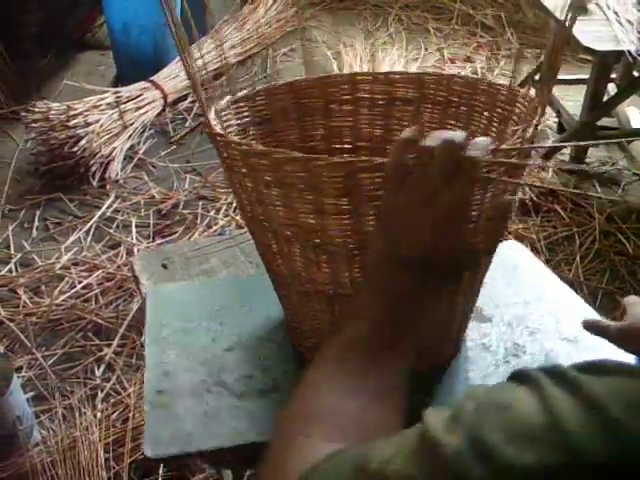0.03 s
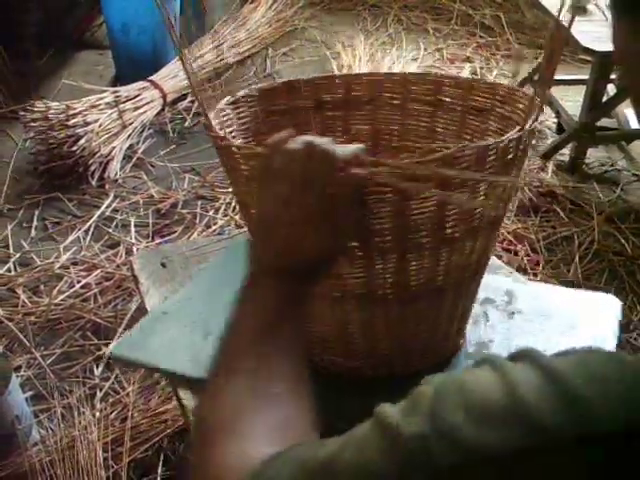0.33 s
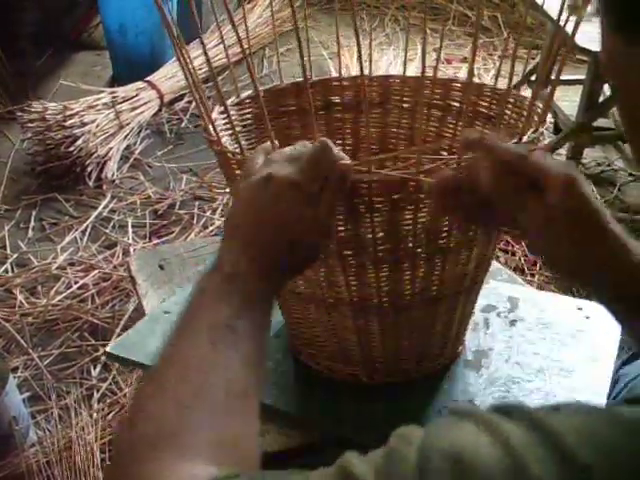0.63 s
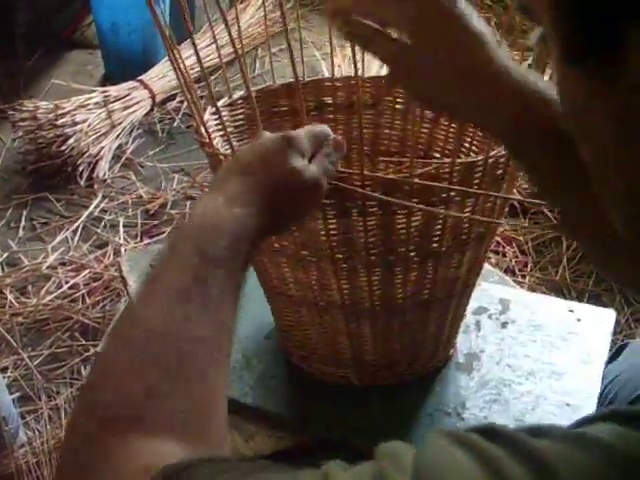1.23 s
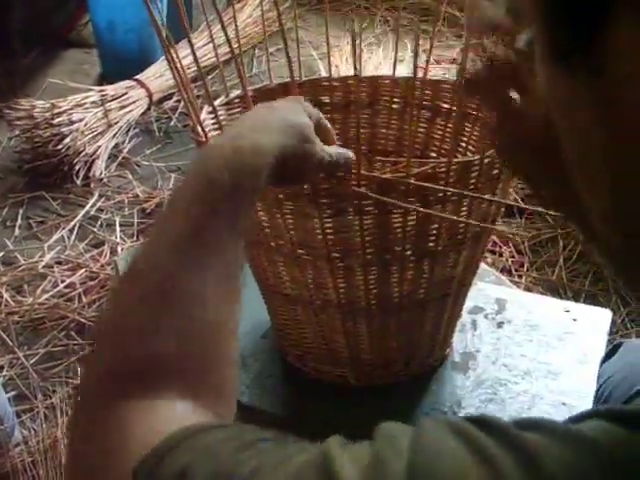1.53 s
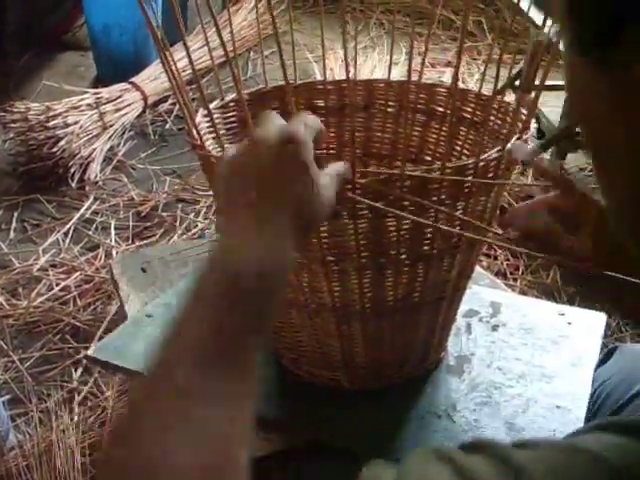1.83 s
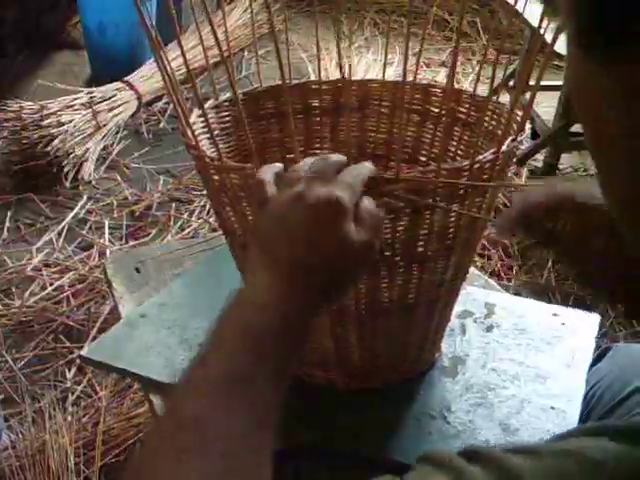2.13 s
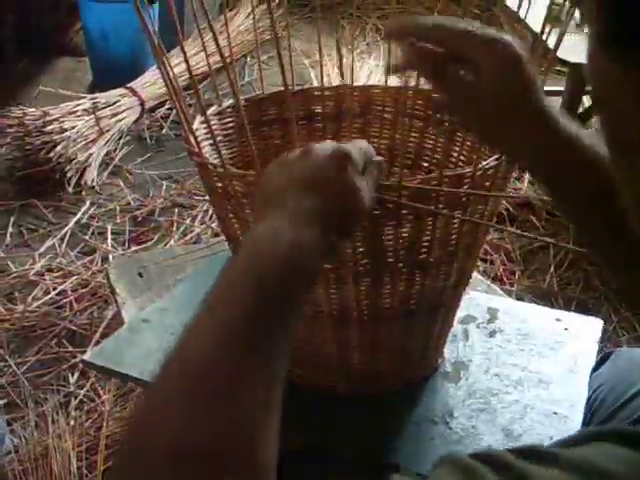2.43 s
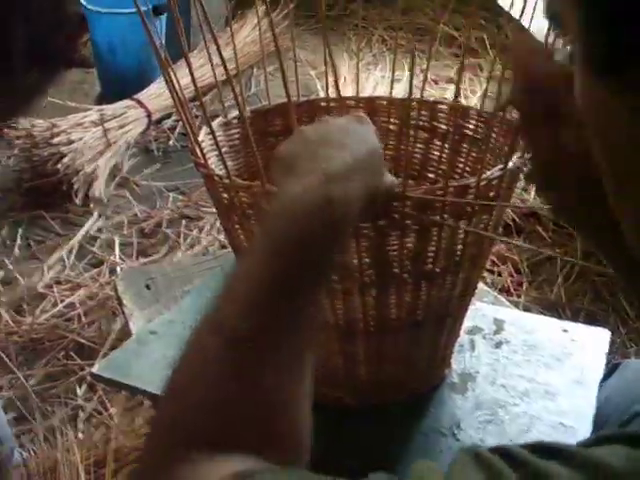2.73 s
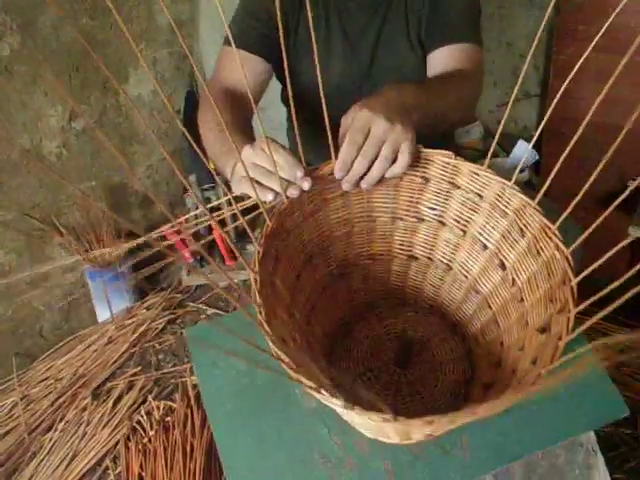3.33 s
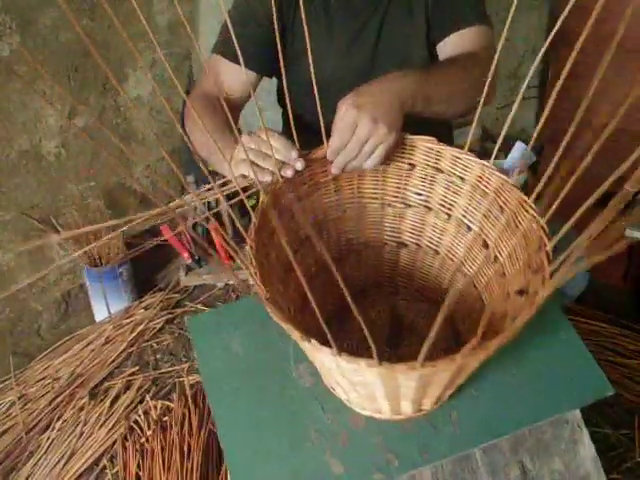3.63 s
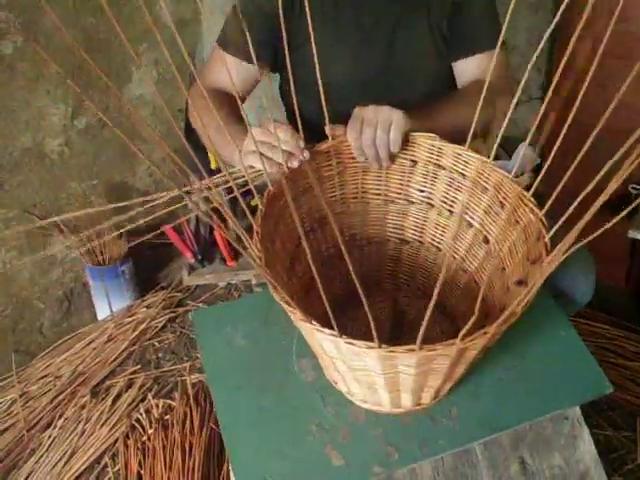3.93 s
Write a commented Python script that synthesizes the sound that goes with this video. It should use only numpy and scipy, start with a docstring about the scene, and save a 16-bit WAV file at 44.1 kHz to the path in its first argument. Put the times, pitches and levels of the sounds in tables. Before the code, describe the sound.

Willow rods rustle and scrape as a basket is woven by hand in a quiet workshop. A soft, slightly squeaky pull fills the first half second, followed by short, faint tucks and small clicks. Around 2.7 seconds a tight rod gives a close run of dry knocks. A loud snap comes at 3.1 seconds, then a smaller one, and a scraping pull with faint creaks lasts until about 4 seconds.

```python
"""In a workshop, willow rods are woven by hand into a basket that stands on a board.
Friction is the driving force: rods scrape past the upright stakes in short tucks and two long pulls,
and the resonances of the woven wall and the base rustle and rumble in answer. Now and then a rod sings
as it slides or flicks against a stake, and once the basket bumps on the board. Close by, a tight rod
sticks and slips in a run of dry knocks, and bent rods snap, one of them loudly."""
import sys
import numpy as np
from scipy import signal
from scipy.fft import rfft, irfft
from scipy.io import wavfile

SR = 44100
rng = np.random.default_rng(int(sys.argv[2]) if len(sys.argv) > 2 else 0)


def transcribe(signal):
    """Save signal, clipped to [-1, 1], as a 16-bit WAV file at the path in sys.argv[1]."""
    frames = np.atleast_2d(signal).T
    limited = np.clip(frames, -1, 1)
    pcm = np.round(limited * 32767).astype(np.int16)
    wavfile.write(sys.argv[1], SR, pcm)


N = 176400
TIME = np.arange(N) / SR

# spectrum of a scraping or splintering rod: frequency_hz, density_db
ROD_SPECTRUM = [(250, -22), (600, -13), (1550, -2.5), (2350, -3), (2850, 0), (3450, -4), (4200, -2),
                (4900, -6), (5600, -18.5), (6500, -14)]


def from_db(db):
    """Decibels are logarithmic: 20 dB is a factor of ten in amplitude."""
    return 10 ** (np.asarray(db) / 20)


def rms_one(x):
    """Normalisation: scale a signal to unit rms."""
    return x / np.sqrt(np.mean(x ** 2) + 1e-20)


def coloured(x, points):
    """Spectral shaping: filter by a curve through (frequency_hz, level_db) points; unit rms."""
    hz, db = np.transpose(points)
    bins_hz = np.maximum(np.arange(N // 2 + 1) * SR / N, 1)
    gain = from_db(np.interp(np.log(bins_hz), np.log(hz), db))
    return rms_one(irfft(rfft(x) * gain, N))


def drift(rate_hz):
    """Low-passed noise wanders at random, mostly slower than rate_hz; unit rms."""
    bins_hz = np.arange(N // 2 + 1) * SR / N
    return rms_one(irfft(rfft(rng.standard_normal(N)) / (1 + (bins_hz / rate_hz) ** 2), N))


def fade(t, t60):
    """Damping: free vibration decays exponentially, by 60 dB in t60 seconds."""
    return np.exp(-np.log(1000) * np.maximum(t, 0) / t60)


def struck(modes, t):
    """Modal response to a blow: a sum of damped sines, each (pitch_hz, level_db, t60_s)."""
    return sum(from_db(db) * np.sin(2 * np.pi * hz * t) * fade(t, t60) for hz, db, t60 in modes)


def add(out, start_s, sound):
    """Superposition: a sound adds to the mix from its start time."""
    i = int(start_s * SR)
    out[i:i + len(sound)] += sound[:N - i]


def friction(grains_per_s=6500, spread_db=2, judder_db=1, judder_hz=73):
    """Friction as shot noise: bark catches on bark in dense, uneven impulses."""
    size_db = spread_db * np.minimum(rng.exponential(1, N), 5) + judder_db * drift(judder_hz)
    signs = rng.choice([-1, 1], N)
    catches = rng.random(N) < grains_per_s / SR
    return from_db(size_db) * signs * catches


def resonate(force, resonances):
    """Forced vibration: friction drives parallel resonances of alternating sign, which ring on."""
    t = TIME[:SR // 4]
    ring = sum((-1) ** k * from_db(db) * width * np.exp(-np.pi * width * t) * np.cos(2 * np.pi * hz * t)
               for k, (hz, width, db) in enumerate(resonances))
    drive = rms_one(friction()) * force
    return signal.fftconvolve(drive, ring / np.sqrt(np.sum(ring ** 2)))[:N]


def room_air(level_db=-57.5):
    """Ambient noise: a faint, steady hush, strongest in the bass."""
    # spectrum of the quiet workshop: frequency_hz, density_db
    spectrum = [(25, 6.5), (60, -1), (400, -4), (950, -4), (4200, -10), (5200, -13.5), (6500, -40)]
    return from_db(level_db) * coloured(rng.standard_normal(N), spectrum)


def basket_bumps(rise_s=0.012):
    """A soft impact on the board excites low modes of the basket."""
    # impacts on the board: start_s, level_db
    impacts = [(2.008, -45.5)]
    # low modes of the basket: pitch_hz, level_db, t60_s
    modes = [(145.6, -1, 0.32), (204, 7.5, 0.098), (238, -2.5, 0.17)]
    out, t = np.zeros(N), TIME[:SR // 2]
    for start_s, db in impacts:
        add(out, start_s, from_db(db) * np.minimum(t / rise_s, 1) * struck(modes, t))
    return out


def stake_flicks():
    """A rod lands on a stake, and its dying rattle drives resonances at that stake's own pitch."""
    # flicks against a stake: start_s, level_db, rattle_t60_s, pitch_ratio
    flicks = [(0.623, -49, 0.31, 0.89), (1.254, -50.5, 0.7, 1.16), (1.456, -45.5, 0.35, 1.065),
              (3.476, -36, 0.15, 0.927)]
    # resonances of a stake: pitch_hz, width_hz, level_db
    stake_modes = [(1030, 90, 2), (1650, 160, -4), (2265, 360, -7.5)]
    out = np.zeros(N)
    for start_s, db, t60, ratio in flicks:
        rattle = from_db(db) * (TIME >= start_s) * fade(TIME - start_s, t60)
        out += resonate(rattle, [(hz * ratio, width, level) for hz, width, level in stake_modes])
    return out


def rod_groans(min_width_hz=15, width_share=0.058):
    """Friction excites a narrow resonance, which glides as the free length of the rod changes."""
    # a sliding rod sings: start_s, length_s, first_hz, last_hz, level_db
    groans = [(0.043, 0.16, 4490, 3893, -42), (0.047, 0.1, 3200, 2710, -43.5),
              (0.158, 0.086, 2870, 2905, -42.5), (0.618, 0.06, 996, 970, -50.5),
              (0.851, 0.025, 4330, 4310, -48), (2.062, 0.11, 989, 1003, -54),
              (3.192, 0.03, 5070, 3880, -31), (3.22, 0.08, 2020, 1990, -38.5),
              (3.572, .15, 430, 259, -39.5), (3.69, 0.094, 951, 918, -38), (3.683, 0.13, 412, 451, -44.5)]
    out = np.zeros(N)
    for start_s, length_s, first_hz, last_hz, db in groans:
        progress = np.clip((TIME - start_s) / length_s, 0, 1)
        phase = 2 * np.pi * np.cumsum(first_hz + (last_hz - first_hz) * progress) / SR
        width_hz = min_width_hz + width_share * first_hz
        # a weak tone inside a band of noise
        rough_tone = (1 + drift(width_hz)) * np.sin(phase) + drift(width_hz) * np.cos(phase)
        out += from_db(db) * np.sin(np.pi * progress) * rough_tone / np.sqrt(2)
    return out


def weaving(rod_gain_db=0.55, wall_gain_db=-2.2, base_gain_db=-4.5):
    """Sliding friction drives rod, woven wall and base; incoherent strokes add in power."""
    # short tucks of a rod: start_s, rise_s, t60_s, rod_db, wall_db
    tucks = [(0.619, 0.004, 0.59, -61.5, -54), (0.8, 0.077, 0.25, -51, -56),
             (.895, 0.0084, 0.35, -49.5, -52.5), (1.2005, 0.0011, 0.23, -51.5, -55),
             (1.246, 0.013, 0.41, -41.5, -51.5), (1.308, 0.002, 0.33, -46, -47.5),
             (1.453, 0.0012, 0.39, -46.5, -44.5), (1.642, 0.0098, 0.6, -52, -51),
             (2.076, 0.016, 1, -50, -55), (2.158, 0.00071, 0.026, -44.5, -49),
             (2.175, 0.0012, 0.25, -48, -52), (2.236, 0.019, 0.52, -42, -41), (2.263, 0.012, 0.1, -38, -43),
             (2.378, 0.0014, 0.97, -43, -46), (2.474, 0.0017, 0.43, -42, -48),
             (2.484, 0.036, 0.65, -40, -43), (2.657, .004, 0.25, -40, -34.5),
             (2.701, 0.076, 0.34, -38.5, -35), (2.835, 0.025, 0.55, -47.5, -46.5),
             (2.97, .03, 1, -53.5, -46.5), (3.046, 0.015, 0.3, -44.5, -45)]
    # envelopes of the two long pulls: time_s, rod_db, wall_db, base_db
    first_pull = [(0, -43.5, -51, -40.5), (.045, -44.5, -44, -59), (.11, -41, -41, -50.5),
                  (.2, -39.5, -37, -38.5), (.275, -44, -35.5, -39.5), (.33, -49, -44.5, -42),
                  (.41, -62.5, -51.5, -54), (.52, -89, -65.5, -89)]
    second_pull = [(3.175, -32.5, -28.5, -30), (3.217, -32.5, -54, -33), (3.222, -33, -26.5, -32),
                   (3.285, -40.5, -39, -38.5), (3.31, -42, -40, -37.5), (3.38, -55.5, -49, -43),
                   (3.44, -51.5, -43.5, -47), (3.48, -44, -43, -42.5), (3.53, -50.5, -44, -44),
                   (3.665, -53.5, -43, -52.5), (3.685, -42, -45.5, -47), (3.729, -51.5, -44, -39.5),
                   (3.781, -48, -42.5, -39.5), (3.88, -57, -52, -44.5), (4, -51, -44, -49)]
    # the base drags on the board as the basket is turned: time_s, base_db
    drag = [(1.2, -64), (1.36, -54.5), (1.66, -52), (1.82, -77)]
    # resonances of the woven wall and of the basket on its board: pitch_hz, width_hz, level_db
    wall_modes = [(551, 140, -0.5), (660, 44, 3.5), (723.5, 41, 6.5), (836, 126, 1.5), (956, 39, 3),
                  (1038, 26, 1.5), (1166, 38, -1.5), (1360, 180, -13.5)]
    base_modes = [(153.7, 42, -8), (245, 25.4, 1), (313.8, 11, -0.5), (397, 57, -3), (474, 45, -5.5)]
    base_re_wall_db, base_low_hz = -10.5, 160
    # a bright bite as each tuck takes hold
    bite_hz, bite_width_hz, bite_db, bite_t60_s = 4230, 780, 5.5, 0.056

    power, bite_force = np.zeros((3, N)), np.zeros(N)
    for start_s, rise_s, t60, rod_db, wall_db in tucks:
        grip = np.clip((TIME - start_s) / rise_s, 0, 1)
        gains = from_db([rod_db, wall_db, wall_db + base_re_wall_db])[:, None]
        power += (gains * grip * fade(TIME - start_s - rise_s, t60)) ** 2
        bite_force += from_db(rod_db + bite_db) * grip * fade(TIME - start_s, bite_t60_s)
    for pull in (first_pull, second_pull):
        times, *levels = np.transpose(pull)
        pulling = (TIME >= times[0]) * (TIME <= times[-1])
        power += np.array([from_db(np.interp(TIME, times, db)) ** 2 for db in levels]) * pulling
    drag_db = np.interp(TIME, *np.transpose(drag), left=-np.inf, right=-np.inf)
    power[2] += from_db(drag_db) ** 2
    rod_force, wall_force, base_force = np.sqrt(power)

    scrape = from_db(rod_gain_db) * rod_force * coloured(friction(), ROD_SPECTRUM)
    bite = resonate(bite_force, [(bite_hz, bite_width_hz, 0)])
    wall = from_db(wall_gain_db) * resonate(wall_force, wall_modes)
    base = from_db(base_gain_db) * resonate(base_force, base_modes)
    radiation = signal.butter(2, base_low_hz, "high", fs=SR, output="sos")  # deep bass radiates poorly
    return scrape + bite + signal.sosfilt(radiation, wall + base)


def rod_knocks(band_hz=(237, 4250), crack_spread=0.059, squeak_s=0.0045, squeak_glide=0.69):
    """Stick-slip: each slip gives a woody ring and a crack, with a rising squeak as the bark regrips; a dull
    thud is sounded the same way."""
    # knocks close by: slips of a tight rod, and last a dull thud sounded the same way: start_s, level_db,
    # ring_hz, ring_t60_s, squeak_hz, squeak_db
    knocks = [(1.9854, -38.5, 900, 0.0085, 3300, -45), (2.6581, -7.5, 990, .011, 2750, -19),
              (2.7284, -15.5, 486, 0.0095, 2610, -40), (2.7338, -18.5, 616, 0.007, 2900, -41),
              (2.7463, -13.5, 750, 0.0053, 3510, -22.5), (2.7531, -12.5, 760, 0.013, 3410, -18),
              (2.7573, -12.5, 833, 0.015, 3730, -21.5), (2.7602, -11, 753, 0.014, 2800, -29),
              (2.7640, -14, 778, 0.032, 2720, -29), (2.7682, -11.5, 772, 0.012, 2900, -23),
              (2.7831, -6, 950, 0.0093, 3290, -29), (2.7862, -11.5, 1067, .022, 4000, -37),
              (2.8153, -12.5, 1030, 0.018, 3000, -33), (3.2222, -24, 520, 0.022, 3500, -38)]
    # modes of the crack: pitch_hz, level_db, t60_s
    crack_modes = [(1540, -6.5, 0.005), (2640, -11, 0.01), (3850, -12.5, 0.0067), (4420, -20, 0.02)]
    out, t = np.zeros(N), TIME[:SR // 10]
    softening = signal.butter(2, band_hz, "band", fs=SR, output="sos")
    progress = np.minimum(t / squeak_s, 1)
    for start_s, db, ring_hz, t60, squeak_hz, squeak_db in knocks:
        modes = [(hz * (1 + crack_spread * rng.normal()), level, decay)
                 for hz, level, decay in crack_modes]
        wood = signal.sosfilt(softening, struck([(ring_hz, 0, t60)], t) - struck(modes, t))
        rising_hz = squeak_hz * (1 + squeak_glide * (progress - .5))
        squeak = np.sin(np.pi * progress) ** 2 * np.sin(2 * np.pi * np.cumsum(rising_hz) / SR)
        add(out, start_s, from_db(db) * wood + from_db(squeak_db) * squeak)
    return out


def rod_snaps(rise_s=0.00059, chirp_s=0.0023, sweep_hz=2240, sweep_s=0.00084):
    """Dispersion: high bending waves arrive first, so a snap is a falling chirp with a splintery tail."""
    # snaps of a bent rod: start_s, level_db, final_hz
    snaps = [(1.0223, -40.5, 2810), (1.9841, -32.5, 2760), (2.4742, -28, 3510), (3.0708, -33.5, 2830),
             (3.1193, -1, 2593), (3.1798, -17, 3740), (3.477, -33.5, 3350)]
    # low ring of the rod after a snap: pitch_hz, level_db, t60_s
    body_modes = [(537, -1, 0.013), (841, 5, 0.0076), (1550, 3.5, 0.0093)]
    tail_db, tail_t60_s, body_db = -18, 0.026, -9
    out, t = np.zeros(N), TIME[:SR // 10]
    attack = np.minimum(t / rise_s, 1) ** 2
    body = from_db(body_db) * struck(body_modes, t)
    for start_s, db, final_hz in snaps:
        falling_hz = final_hz + sweep_hz * np.exp(-(t / sweep_s) ** 4)
        chirp = np.sin(2 * np.pi * np.cumsum(falling_hz) / SR) * np.exp(-(t / chirp_s) ** 4)
        splinters = coloured(rng.standard_normal(N), ROD_SPECTRUM)[:len(t)]
        tail = from_db(tail_db) * splinters * fade(t, tail_t60_s)
        add(out, start_s, from_db(db) * attack * (chirp + tail + body))
    return out


def scene():
    """Superposition: the handwork adds to the quiet air of the workshop in one channel."""
    background = room_air() + basket_bumps()
    return (background + weaving() + stake_flicks() + rod_groans() + rod_knocks() + rod_snaps())[None]


def record(dry, mic_stop_hz=6667, overload=0.66, cutoff_hz=16400):
    """Band limiting and saturation: a dull microphone rounds the loudest peak; a low-pass follows."""
    dull = signal.sosfilt(signal.cheby2(14, 70, mic_stop_hz, fs=SR, output="sos"), dry)
    clipped = dull / (1 + np.abs(dull / overload) ** 10) ** (1 / 10)
    return signal.sosfilt(signal.ellip(8, .2, 70, cutoff_hz, fs=SR, output="sos"), clipped)


dry = scene()
out = record(dry)
transcribe(out)
```